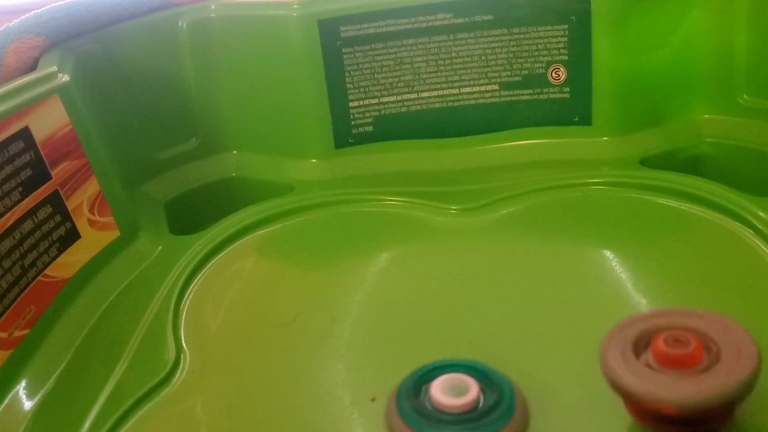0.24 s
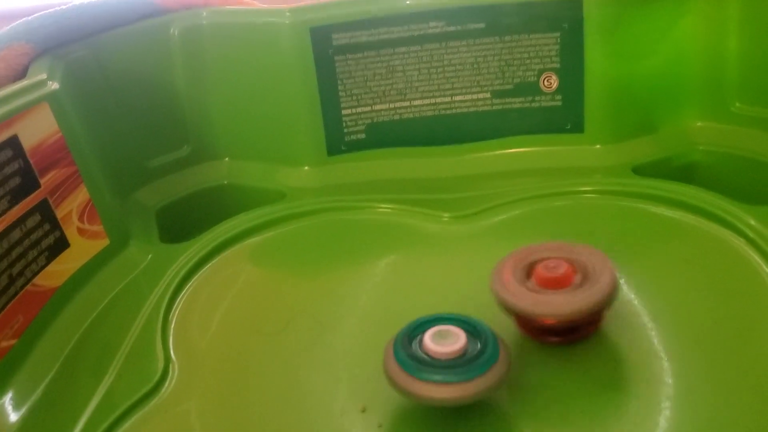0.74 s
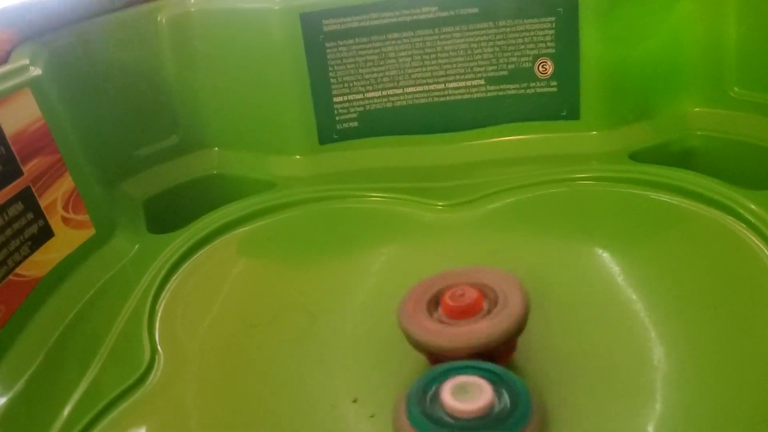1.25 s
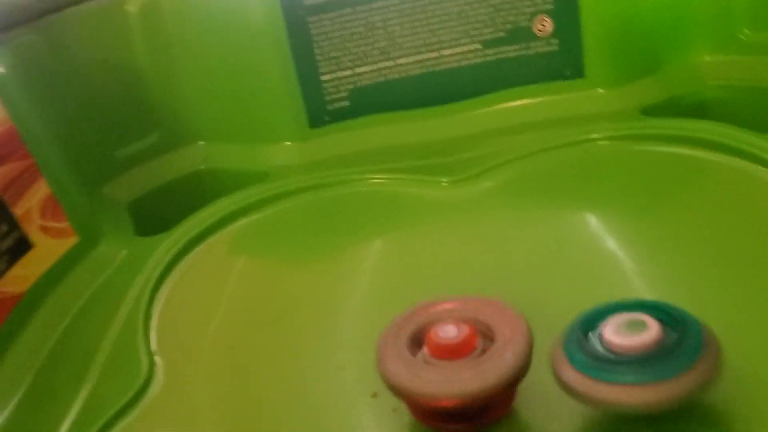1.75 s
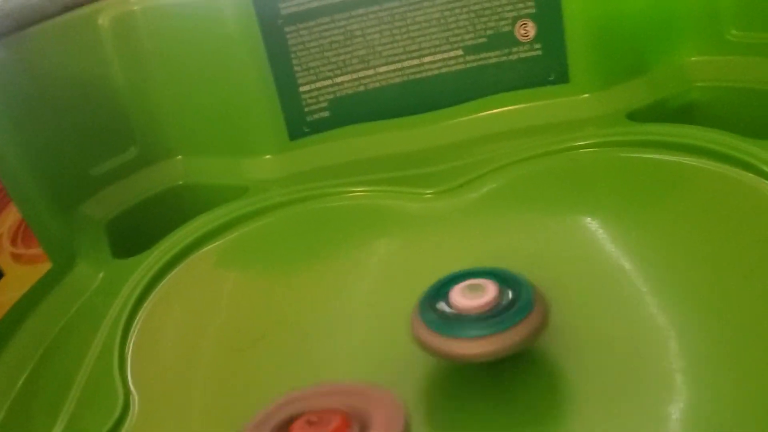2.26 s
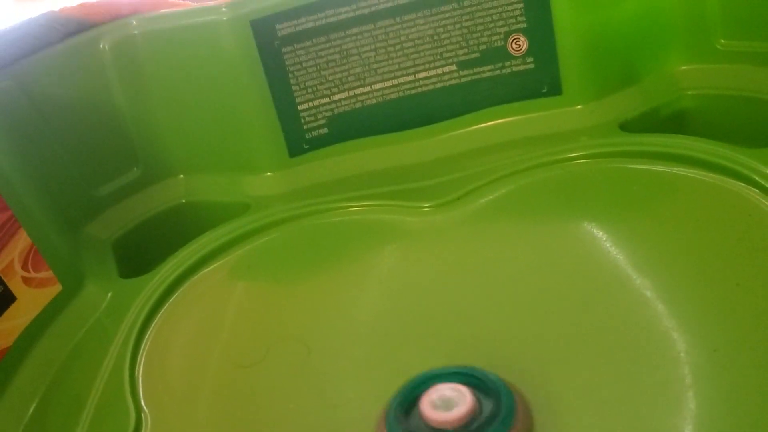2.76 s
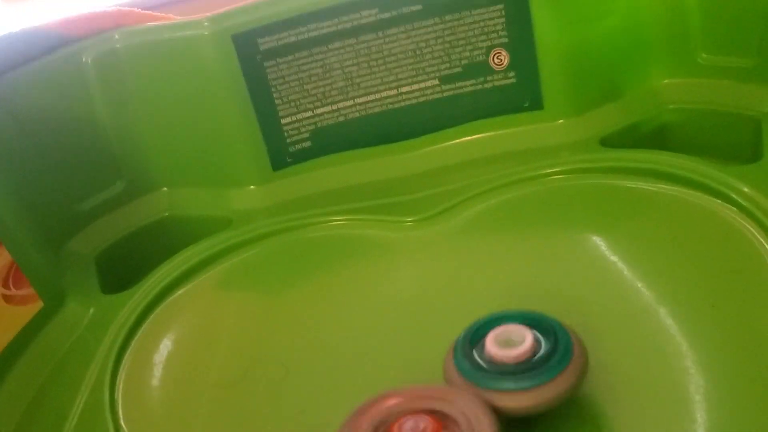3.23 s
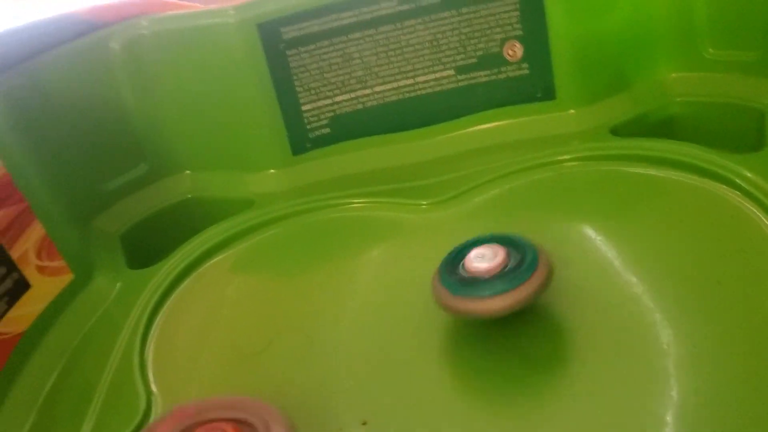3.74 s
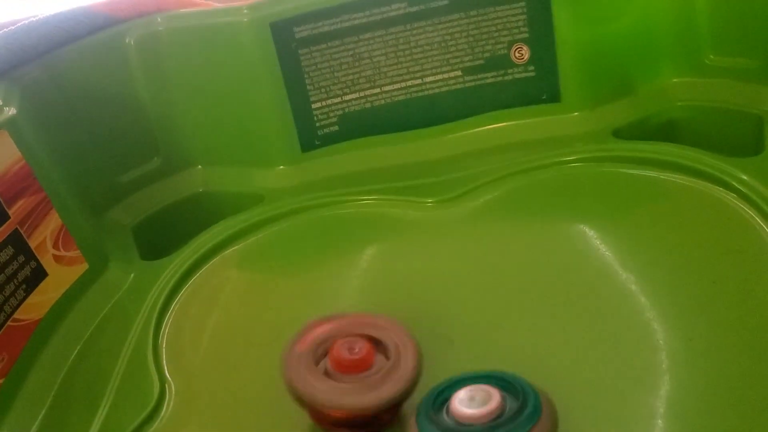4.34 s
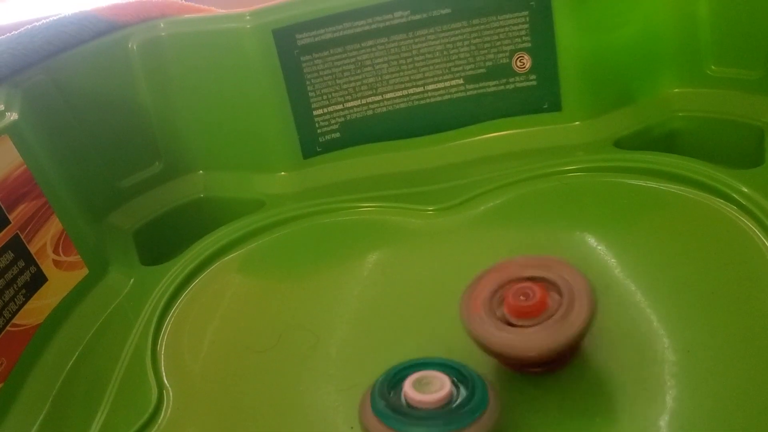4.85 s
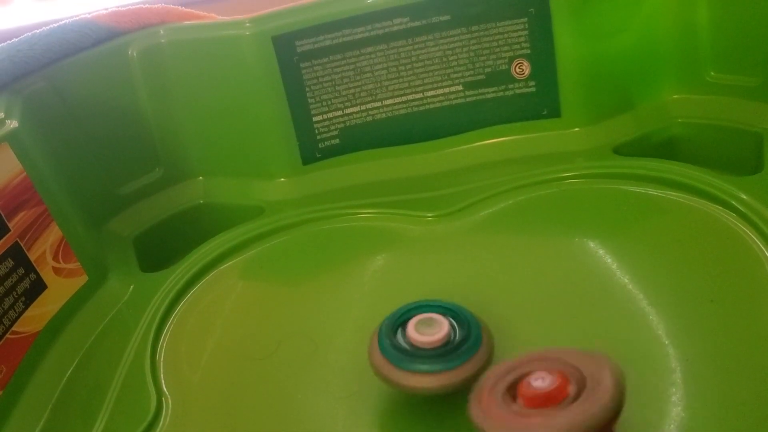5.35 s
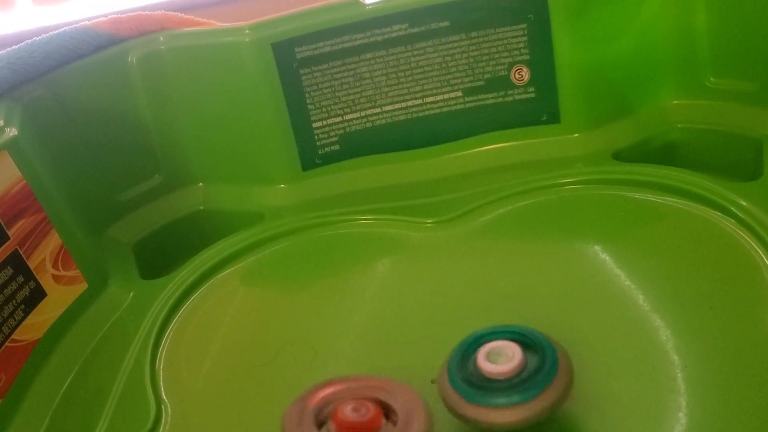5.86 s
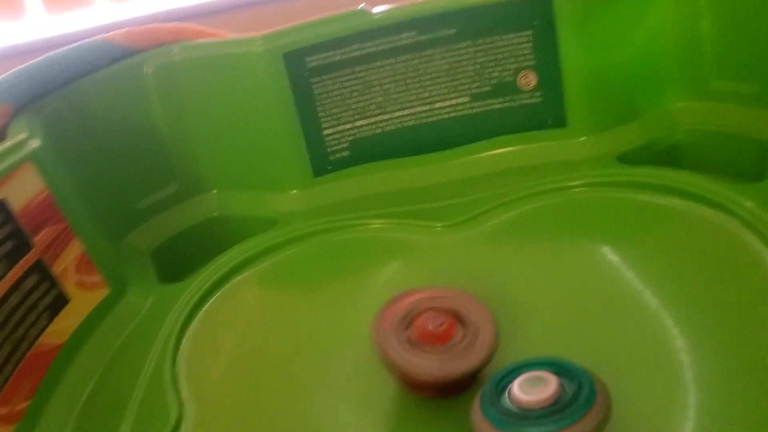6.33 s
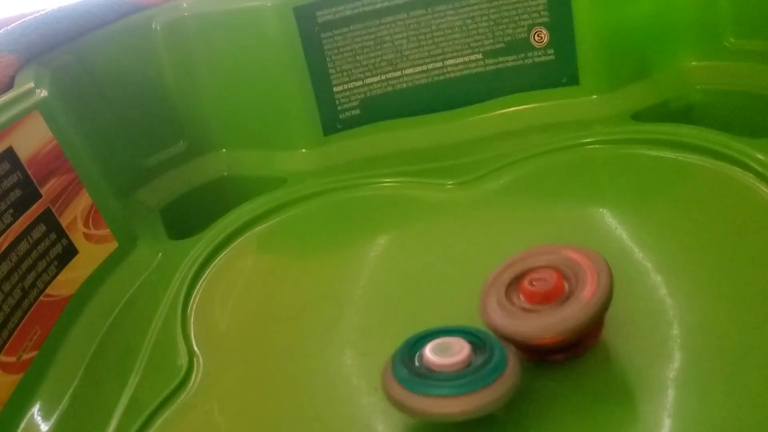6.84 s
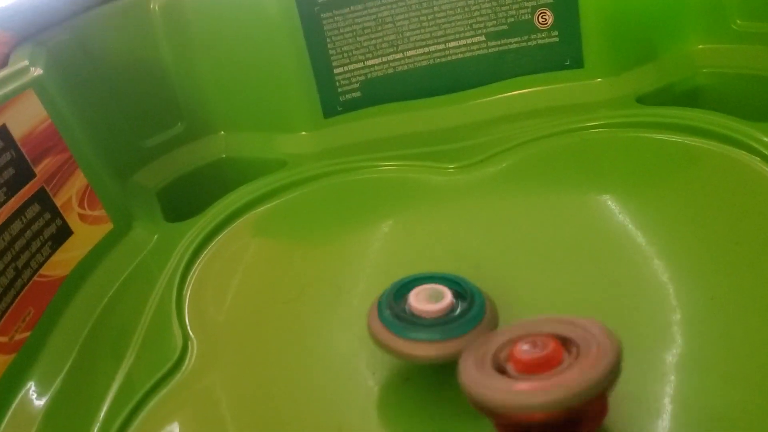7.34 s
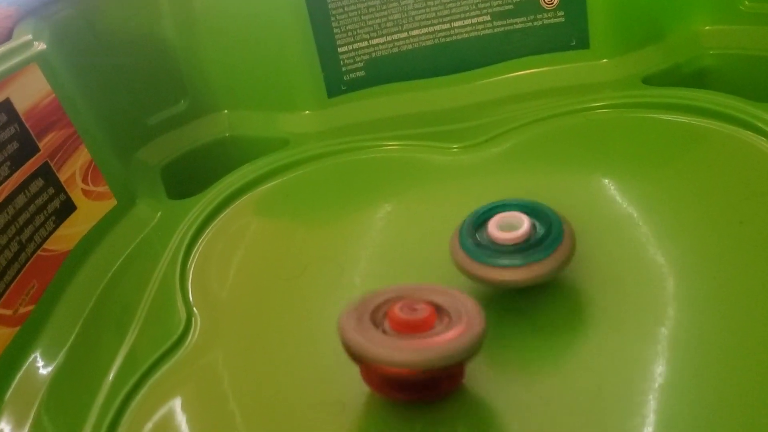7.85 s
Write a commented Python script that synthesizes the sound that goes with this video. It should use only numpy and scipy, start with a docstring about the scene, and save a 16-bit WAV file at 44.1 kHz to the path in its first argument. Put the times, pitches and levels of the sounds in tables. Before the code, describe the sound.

Two plastic spinning tops rumble around a hollow plastic arena, clacking together repeatedly with occasional high, warbling metallic rings.

```python
"""Spinning tops in a plastic arena

A living room, a stereo microphone close to a thin plastic arena in which a red and a green top circle.
Their plastic rims clack together, their metal weight discs ring with a fast warble as they spin,
and the tops hop and drum on the hollow floor. Between clashes the tips rumble on the plastic,
the rims graze and loose parts tick, all over the low drone of the room."""
import sys
import numpy as np
from scipy import signal
from scipy.fft import rfft, irfft
from scipy.io import wavfile

SR = 44100
rng = np.random.default_rng(int(sys.argv[2]) if len(sys.argv) > 2 else 0)


def waveform_to_disk(signal):
    """Save audio, clipped to [-1, 1], as 16-bit WAV at the path in sys.argv[1]."""
    frames = np.transpose(np.atleast_2d(signal))
    scaled = np.clip(frames, -1, 1) * 32767
    samples = np.round(scaled).astype(np.int16)
    wavfile.write(sys.argv[1], SR, samples)


N = 356769
TIME = np.arange(N) / SR

# the tops slowing down: time_s, red_turns_per_s, green_turns_per_s
SPIN_RATES = [(0, 26, 27), (2.3, 21.5, 24.7), (4.6, 17.8, 21.2), (6.3, 16.7, 19.4), (8.09, 15.5, 18)]
# modes of the green top's disc, the whole arena and its floor: pitch_hz, level_db, t60_s
GREEN_DISC_MODES = [(5587, -5, .18), (6035, 0, .31), (8060, -27, .2), (12160, -19, .17), (12400, -13, .17)]
DEEP_MODES = [(61.4, -2.5, 0.41), (75, 2, 0.27)]
FLOOR_MODES = [(120, 2.5, .1), (143.4, 2, 0.19), (169.2, -4.5, 0.054), (189.7, -11.5, 0.21),
               (280, -12, 0.16), (302, -13.5, 0.21), (369.3, -16.5, 0.2), (387, -39.5, 0.24)]
# spectrum of a knock on hollow plastic: frequency_hz, level_db
KNOCK_SPECTRUM = [(200, -20.5), (500, -13), (800, -1), (1250, -3), (1800, 0), (2600, -3), (3600, 1),
                  (5000, -8), (9000, -17)]


def from_db(db):
    """Decibels to gain."""
    return 10 ** (np.asarray(db) / 20)


def rms_one(x):
    """Scale to unit rms."""
    return x / np.sqrt(np.mean(x ** 2) + 1e-20)


def in_time(rows):
    """Each column of a curve, sample by sample."""
    times, *columns = np.transpose(rows)
    return [np.interp(TIME, times, column) for column in columns]


def at_hz(points, hz):
    """Read a table on a log-frequency axis."""
    table_hz, value = np.transpose(points)
    return np.interp(np.log(np.maximum(hz, 1)), np.log(table_hz), value)


def add(out, start_s, sound):
    """Mix a sound in from start_s."""
    i = round(start_s * SR)
    out[..., i:i + sound.shape[-1]] += sound[..., :N - i]


def colour(x, spectrum, keep_power=True, size=4096):
    """Causal (minimum-phase) filter with the given spectrum."""
    gain = from_db(at_hz(spectrum, np.arange(size // 2 + 1) * SR / size))
    cepstrum = irfft(np.log(rms_one(gain) if keep_power else gain))
    cepstrum[1:size // 2] *= 2
    cepstrum[size // 2 + 1:] = 0
    impulse = irfft(np.exp(rfft(cepstrum)))
    return signal.oaconvolve(np.atleast_2d(x), impulse[None], axes=1)[:, :N]


def drift(rate_hz):
    """A random wander of unit rms."""
    knots = rng.standard_normal(N // 100)
    return rms_one(np.interp(TIME * rate_hz, np.arange(len(knots)), knots))


def panned(pan_db):
    """Gains of the two channels, the left pan_db above the right."""
    return rms_one(from_db(np.array([[.5], [-.5]]) * pan_db))


def stereo_noise(alike, size):
    """Left and right noise with correlation alike."""
    mid, side = rng.standard_normal((2, size))
    return np.sqrt((1 + alike) / 2) * mid + np.sqrt((1 - alike) / 2) * side * [[1], [-1]]


def bursts(times, levels_db, rise_s, t60_s, alike, pans_db=0, size=4096):
    """Each contact wakes a dense cluster of heavily damped plastic modes: a short burst of noise."""
    out, t = np.zeros((2, N)), TIME[:size]
    shape = (1 - np.exp(-(t / rise_s) ** 2)) * from_db(-60 * t / t60_s)
    for start_s, db, pan_db in np.broadcast(times, levels_db, pans_db):
        add(out, start_s, from_db(db) * panned(pan_db) * shape / shape.max() * stereo_noise(alike, size))
    return out


def ring(forces, modes):
    """Damped modes, each driven by its own force; the speed of the surface makes the sound."""
    swing = 0
    for force, (hz, db, t60_s) in zip(forces, modes):
        decay, step = from_db(-60 / (t60_s * SR)), 2 * np.pi * hz / SR
        poles = [1, -2 * decay * np.cos(step), decay * decay]
        swing = swing + signal.lfilter([from_db(db)], poles, force + 1e-18)
    return signal.lfilter([.5, 0, -.5], [1], swing) + 1e-18


def struck(modes, times, levels_db, spread_db, contact_hz):
    """Soft blows; the spot that is hit sets the strength of each mode."""
    forces = np.zeros((len(modes), N))
    spot_db = spread_db * rng.standard_normal((len(times), len(modes))).T
    forces[:, np.round(times * SR).astype(int)] = from_db(levels_db + spot_db)
    forces[2::2] *= -1   # neighbouring modes swing against each other
    return signal.sosfilt(signal.butter(2, contact_hz, fs=SR, output="sos"), ring(forces, modes))


def room(x, wet_db, build_up_s, size=22000):
    """The living room adds a diffuse tail that builds up, then lasts longest in the midrange."""
    # reverberation time: frequency_hz, t60_s
    decay_times = [(200, 0.14), (1000, 0.35), (3000, 0.28), (6000, 0.28), (10000, 0.23), (15000, 0.14)]
    t, tail = TIME[:size], 0
    edges_hz = np.geomspace(150, 19000, num=9)
    for low, high in zip(edges_hz, edges_hz[1:]):
        bandpass = signal.butter(2, [low, high], "band", fs=SR, output="sos")
        band = signal.sosfilt(bandpass, stereo_noise(0.18, size))
        tail = tail + band * from_db(-60 * t / at_hz(decay_times, np.sqrt(low * high)))
    tail = rms_one(tail * (1 - np.exp(-(t / build_up_s) ** 2))) / np.sqrt(size)
    return x + from_db(wet_db) * signal.oaconvolve(x, tail, axes=1)[:, :N]


def room_drone():
    """Low, steady room tone, much alike on both sides of the microphone."""
    # spectrum of the room tone: frequency_hz, level_db
    drone_spectrum = [(20, -27), (40, -17.5), (58, 5.5), (75, 4.5), (110, -8.5), (300, -22), (1000, -45.5),
                      (4000, -54), (15000, -71)]
    return from_db(-51.5) * colour(stereo_noise(0.78, N), drone_spectrum)


def ticking():
    """Loose parts of the red top tick four times a turn, unevenly."""
    # the top rattles more once it slows and leans: time_s, level_db
    rattle_curve = [(0, -79), (3.0, -81), (3.4, -54), (3.8, -77), (4.75, -63.5), (6.2, -62), (8.09, -65.5)]
    # spectrum of a tick: frequency_hz, level_db
    tick_spectrum = [(2000, -13.5), (4000, 0), (7000, 0), (8500, -5.5), (11000, -2), (14500, 0),
                     (16000, -7.5)]
    turns = np.cumsum(in_time(SPIN_RATES)[0]) / SR
    knocks = np.diff(np.floor(4 * turns + .06 * drift(70)), prepend=0) > 0
    knocks = knocks * from_db(7.9 * rng.standard_normal(N) + 3 * np.sin(2 * np.pi * turns))
    envelope = rms_one(signal.lfilter([1], [1, -np.exp(-1 / (.001 * SR))], knocks + 1e-18))
    ticks = from_db(in_time(rattle_curve)[0]) * colour(envelope * stereo_noise(0.17, N), tick_spectrum)
    return room(ticks, wet_db=-1.5, build_up_s=.006)


def floor_hum(pitch_hz=140, waver=0.0345):
    """For a moment a tip chatters evenly, near the main mode of the arena floor."""
    # swell of the hum: time_s, level_db
    hum_curve = [(4.55, -59), (4.65, -46), (4.74, -39.5), (4.83, -43.5), (4.9, -48), (5.0, -58)]
    times, db = np.transpose(hum_curve)
    phase = 2 * np.pi * np.cumsum(pitch_hz * (1 + waver * drift(40))) / SR
    level = from_db(np.interp(TIME, times, db, left=-np.inf, right=-np.inf) + 2.2 * drift(36))
    return level * np.sqrt(2) * np.sin(phase)


def rolling_levels(rise_db_per_s=226.5, fall_db_per_s=118):
    """Rumble, rasp and hiss levels: steady rolling, over which each skid swells and dies away."""
    # tips rolling on the floor: time_s, rumble_db, rasp_db, hiss_db
    rolling_curve = [(0.0, -52, -55.5, -63), (0.45, -50, -57, -56.5), (0.71, -45.5, -62, -59),
                     (0.8, -69, -64.5, -64), (1.35, -51.5, -58.5, -61.5), (1.87, -58, -57.5, -61.5),
                     (2.1, -45, -54.5, -60), (2.55, -52, -59, -63), (3.02, -59, -63, -65),
                     (3.3, -48, -52.5, -56), (3.78, -53, -61, -66), (4.0, -45, -54.5, -59),
                     (4.52, -51.5, -58.5, -74), (4.76, -44, -57, -79), (5.05, -50, -60, -70.5),
                     (6.1, -48, -57, -65.5), (7.2, -50.5, -60, -70), (8.09, -52, -59.5, -68)]
    # a top knocked off course skids: peak_s, rumble_db, rasp_db, hiss_db
    skids = [(0.97, -39, -58, -75), (1.49, -46, -48, -62), (2.3, -36, -48, -47), (3.541, -34, -45.5, -42),
             (4.26, -42, -45, -68)]
    levels_db = np.array(in_time(rolling_curve))
    for peak_s, *peaks_db in skids:
        fade_db = np.maximum(rise_db_per_s * (peak_s - TIME), fall_db_per_s * (TIME - peak_s))
        levels_db = np.maximum(levels_db, np.array(peaks_db)[:, None] - fade_db)
    return levels_db


def rolling_tips():
    """The tips judder over the floor, harder once a turn."""
    # spectra of a tip rubbing on plastic: frequency_hz, level_db
    rasp_spectrum = [(200, -6.5), (380, 6), (520, -25.5), (730, 15), (950, 6), (1500, 7), (2300, -4),
                     (4000, -21.5), (8000, -40)]
    hiss_spectrum = [(1500, -12), (2600, -2.5), (3600, -0.5), (5500, -3.5), (7000, -16), (9000, -16),
                     (15000, -16)]
    rumble_db, rasp_db, hiss_db = rolling_levels()
    turns = np.cumsum(in_time(SPIN_RATES)[1]) / SR
    pressure = from_db(3.3 * np.sin(2 * np.pi * turns) + 2.1 * drift(90))
    judder = signal.sosfilt(signal.butter(2, 450, fs=SR, output="sos"), pressure * rng.standard_normal(N))
    rumble = from_db(rumble_db) * rms_one(ring([judder] * len(FLOOR_MODES), FLOOR_MODES))
    sway = from_db(rumble_db - 2) * rms_one(ring([judder] * len(DEEP_MODES), DEEP_MODES))
    rasp = from_db(rasp_db - 2.5) * colour(rms_one(pressure * stereo_noise(0.19, N)), rasp_spectrum)
    hiss = from_db(hiss_db - 3.5) * colour(rms_one(pressure * stereo_noise(0.19, N)), hiss_spectrum)
    return rumble + sway + rasp + hiss


def graze_touches(retouch_s=.011, retouch_db=-8):
    """A double touch on each turn of the green top; returns start_s, touch_db, scuff_db."""
    # the tops lean together: start_s, turn_count, touch_db, scuff_db, scuff_change_db_per_turn
    graze_runs = [(1.0784, 2, -43.5, -50.5, -2), (4.3128, 1, -40, -51, 0), (4.999, 7, -43.5, -49.5, -1.5),
                  (5.8513, 4, -44, -54.5, 1), (6.048, 1, -39, -46, 0), (6.1099, 2, -44.5, -42.5, -8),
                  (6.619, 4, -46, -54.5, 0)]
    spin = in_time(SPIN_RATES)[1]
    first = np.array([(start_s + turn / spin[round(start_s * SR)], touch_db, scuff_db + turn * change_db)
                      for start_s, count, touch_db, scuff_db, change_db in graze_runs
                      for turn in range(round(count))])
    return np.vstack([first, first + [retouch_s, retouch_db, retouch_db]]).T


def grazes():
    """Light scuffs of rim on rim, which jolt the floor and wake the green disc faintly."""
    # bright and dull spectra of rims rubbing: frequency_hz, level_db
    chirp_spectrum = [(2500, -7.5), (4300, 1), (5350, 5), (6300, -3.5), (8000, -14.5), (15000, -10)]
    scuff_spectrum = [(300, -14), (700, 14), (1200, 15.5), (1650, 24.5), (2100, -2), (4000, -10.5),
                      (9000, -27)]
    times, touch_db, scuff_db = graze_touches()
    chirp = colour(bursts(times, touch_db - 7, rise_s=0.00053, t60_s=0.042, alike=0.31), chirp_spectrum)
    scuff = colour(bursts(times, scuff_db + 1.5, rise_s=.00044, t60_s=.067, alike=.095), scuff_spectrum)
    jolt = struck(FLOOR_MODES, times, touch_db - 0.5, spread_db=4.5, contact_hz=690)
    green_spin = in_time(SPIN_RATES)[1]
    disc = spinning_disc(times, touch_db - 22.5, 0, GREEN_DISC_MODES, green_spin, order=2, depth=.7)
    return chirp + scuff + jolt + disc


def clashes():
    """All clashes; returns start_s, crack_db, knock_db, jolt_db, red_db, green_db, overtone_db, pan_db."""
    # plastic rim on rim: start_s, crack_db, shell_knock_db, floor_jolt_db, red_disc_db, green_disc_db
    rim_hits = [(0.167, -21.5, -30.5, -45, -57, -51), (0.54, -27, -40.5, -45, -55, -48),
                (0.5426, -25.5, -37.5, -28, -52, -39), (0.5534, -22, -35, -29, -56, -40),
                (0.9211, -30.5, -31, -51, -53, -41.5), (0.928, -17, -28, -27.5, -37, -41),
                (1.3324, -18.5, -23.5, -33, -44, -42), (1.452, -17.5, -23.5, -29.5, -53, -50),
                (1.5, -22, -26, -35, -48, -41.5), (1.9062, -18, -25.5, -28, -47.5, -49.5),
                (1.994, -21.5, -24.5, -27, -38, -45.5), (2.133, -25.5, -36.5, -32.5, -59, -47),
                (2.1453, -21.5, -28, -32.5, -60, -55), (2.7007, -19, -27, -25, -36, -40),
                (2.7112, -17, -30, -31, -31.5, -52), (3.1346, -20.5, -33.5, -30, -42, -39.5),
                (3.2833, -20.5, -26.5, -33.5, -39, -45), (3.292, -34, -29, -39.5, -41, -50),
                (3.3427, -30.5, -30.5, -19, -40.5, -37.5), (4.1027, -17, -31, -23.5, -43, -41),
                (4.113, -24.5, -24.5, -20, -42, -53), (4.3715, -18, -26.5, -24, -61, -40.5),
                (6.8203, -19.5, -25, -29.5, -52, -62), (7.322, -21, -23.5, -31.5, -44.5, -43),
                (7.77, -35, -34, -31, -52, -48), (7.776, -19, -21, -22, -54, -52)]
    # metal disc on disc: start_s, crack_db, floor_jolt_db, red_disc_db, green_disc_db, overtone_db, pan_db
    disc_hits = [(0.1724, -20, -46, -35, -60, -51, 6.5), (0.1796, -20, -36, -37.5, -46, -54, -16),
                 (0.194, -45, -45, -30.5, -45, -56, -10), (2.2343, -19.5, -23.5, -32, -20.5, -16.5, -2),
                 (2.256, -24.5, -23.5, -45.5, -20.5, -26, -12), (3.4274, -16, -21.5, -33, -21.5, -27, 2),
                 (3.447, -26, -44, -54, -18, -35, -4.5), (3.467, -22.5, -17.5, -52, -16, -33, -2),
                 (4.57, -25.5, -44, -35, -25.5, -21.5, -1), (4.592, -34, -31.5, -54, -34, -42, -0.5),
                 (6.354, -22, -17.5, -24.5, -19, -22, -3.5), (6.368, -24, -21, -38, -46, -37, -1),
                 (6.997, -20.5, -22.5, -26.5, -21.5, -24.5, 2)]
    *columns, green_db = np.transpose(rim_hits)
    overtone_db, centred = green_db + 4, np.zeros(len(rim_hits))
    plastic = [*columns, green_db, overtone_db, centred]
    times, crack_db, *rest = np.transpose(disc_hits)
    knock_db = crack_db - 14.5
    metal = [times, crack_db, knock_db, *rest]
    return np.hstack([plastic, metal])


def floor_touches(rebound=.87, bounce_loss_db=4.5):
    """Clashes jolt the floor, hops die in ever shorter bounces; returns start_s and three levels."""
    # a thrown top lands: start_s, boom_db, deep_boom_db, wall_clatter_db, first_flight_s, touch_count
    hops = [(0.201, -43, -40, -37, 0.018, 2), (0.574, -19.5, -36.5, -30, 0.032, 5),
            (0.984, -36, -46.5, -37.5, 0.054, 3), (1.364, -35.5, -47.5, -38.5, 0.033, 2),
            (1.514, -31.5, -52, -36.5, .03, 2), (2.28, -29, -32.5, -36.5, 0.037, 3),
            (2.733, -27, -30, -33, 0.021, 4), (3.161, -35.5, -35, -40.5, .03, 2),
            (3.365, -28, -33, -51.5, .025, 2), (3.507, -39, -27, -24.5, 0.039, 3),
            (4.149, -19, -34, -35.5, 0.033, 1), (4.178, -16.5, -39, -30, .025, 4),
            (4.261, -35, -47, -36.5, 0.022, 2)]
    times, _, _, jolt_db, *_ = clashes()
    deep_db, clatter_db = jolt_db - 12, jolt_db - 9.5
    touches = list(zip(times, jolt_db, deep_db, clatter_db))
    for touch_s, *levels_db, flight_s, count in hops:
        for bounce in range(round(count)):
            touches.append((touch_s, *(np.array(levels_db) - bounce * bounce_loss_db)))
            touch_s += flight_s * rebound ** bounce
    return np.transpose(touches)


def landings():
    """A hopping top drums on the floor, and its tip skips on, rattling the arena walls."""
    # modes of the walls: pitch_hz, level_db, t60_s
    wall_modes = [(595.5, -7.5, 0.091), (700, 1, 0.09), (867, -17, 0.11), (1026, -13, 0.12),
                  (1259, -9, 0.086), (1690, 0, 0.032), (2230, -6.5, 0.11)]
    # spectrum of their clatter: frequency_hz, level_db
    clatter_spectrum = [(200, 0.5), (400, 11), (550, -2), (750, 1.5), (1100, 10.5), (1700, -2.5),
                        (3000, -4.5), (6000, -5.5), (14000, -10)]
    times, boom_db, deep_db, clatter_db = floor_touches()
    boom = struck(FLOOR_MODES, times, boom_db - 6, spread_db=3.5, contact_hz=570)
    deep = struck(DEEP_MODES, times, deep_db + 1, spread_db=3.5, contact_hz=160)
    skips_s = times[:, None] + np.cumsum(rng.uniform(.005, .018, (len(times), 2)), axis=1)
    touch_s = np.concatenate([times, *skips_s.T])
    touch_db = np.concatenate([clatter_db, clatter_db - 6, clatter_db - 12])
    walls = struck(wall_modes, touch_s, touch_db - 13, spread_db=5.5, contact_hz=2340)
    rattle = bursts(touch_s, touch_db - 0.5, rise_s=0.0013, t60_s=0.051, alike=0.49)
    clatter = colour(rattle, clatter_spectrum)
    tap = colour(bursts(times, clatter_db - 1, rise_s=.0003, t60_s=.014, alike=0.44), KNOCK_SPECTRUM)
    return boom + deep + room(tap + clatter + walls, wet_db=-12, build_up_s=0.0022)


def spinning_disc(times, levels_db, pans_db, modes, spin, order, depth, flutter=0.46, size=15000):
    """Each mode's lobes sweep past the microphone and split its tone, order times the spin up and down."""
    out, t = np.zeros((2, N)), TIME[:size]
    tones = np.array([from_db(db - 60 * t / t60_s) * np.exp(2j * np.pi * hz * t) for hz, db, t60_s in modes])
    attack = 1 - np.exp(-t / 0.00055)
    for start_s, db, pan_db in np.broadcast(times, levels_db, pans_db):
        angle = 2 * np.pi * spin[round(start_s * SR)] * t
        ahead, behind = np.exp(2j * np.pi * rng.random((2, 2, len(modes)))) @ tones
        sweep = np.exp(1j * order * angle)
        warble = (behind / sweep + depth * ahead * sweep).real
        wobble = 1 + flutter * np.sin(angle + rng.uniform(0, 2 * np.pi))   # a leaning top swells each turn
        add(out, start_s, from_db(db) * panned(pan_db) * attack * wobble * warble)
    return out


def disc_rings():
    """Clashes that reach the metal set the discs ringing, from the side on which they meet."""
    # modes of the red top's disc, and high overtones of the green one: pitch_hz, level_db, t60_s
    red_modes = [(4688, 0, .19), (12855, -7, .15)]
    high_modes = [(13280, -14, .11), (13700, 0, .15), (14350, -12, .08)]
    times, *_, red_db, green_db, high_db, pan_db = clashes()
    red_spin, green_spin = in_time(SPIN_RATES)
    red = spinning_disc(times, red_db + 2, pan_db, red_modes, red_spin, order=2, depth=1.0)
    green = spinning_disc(times, green_db + .5, pan_db / 2, GREEN_DISC_MODES, green_spin,
                          order=2, depth=0.94)
    high = spinning_disc(times, high_db + 7, pan_db - 0.5, high_modes, green_spin, order=3, depth=0.58)
    return room(red + green + high, wet_db=-13, build_up_s=.006)


def clacks():
    """A bright crack of the rims over the knock of the hollow shells."""
    # spectrum of the crack: frequency_hz, level_db
    crack_spectrum = [(2000, -24.5), (3500, -10.5), (5000, 2.5), (6500, 2), (8000, -3), (10000, 0.5),
                      (11300, 5), (12500, -3.5), (14500, 8.5), (16000, -8.5)]
    times, crack_db, knock_db, *_, pan_db = clashes()
    crack = bursts(times, crack_db + 3.5, rise_s=0.00088, t60_s=0.016, alike=0.27, pans_db=pan_db)
    knock = bursts(times, knock_db + 3.5, rise_s=0.0002, t60_s=0.023, alike=0.29, pans_db=pan_db / 2)
    return (room(colour(crack, crack_spectrum), wet_db=-9, build_up_s=0.0049)
            + room(colour(knock, KNOCK_SPECTRUM), wet_db=-12.5, build_up_s=0.0059))


def scene():
    """The battle in the arena, close up, over the low drone of the room."""
    return (room_drone() + clacks() + disc_rings() + landings() + grazes()
            + rolling_tips() + floor_hum() + ticking())


def record(dry, low_cut_hz=42, high_cut_hz=16000):
    """Each microphone port has its own colour; deep bass and top treble are cut, peaks are rounded."""
    # the two ports hear the arena differently: frequency_hz, left_over_right_db
    port_balance = [(200, 0.5), (600, -1), (1300, -5.5), (2800, 1.5), (5500, 2), (9000, -1.5), (14000, -7)]
    ports = [colour(channel, [(hz, side * db / 2) for hz, db in port_balance], keep_power=False)[0]
             for channel, side in zip(dry, (1, -1))]
    ports = signal.sosfilt(signal.butter(3, low_cut_hz, "high", fs=SR, output="sos"), ports)
    return signal.sosfilt(signal.ellip(10, .1, 80, high_cut_hz, fs=SR, output="sos"), np.tanh(ports))


dry = scene()
out = record(dry)
waveform_to_disk(out)
```